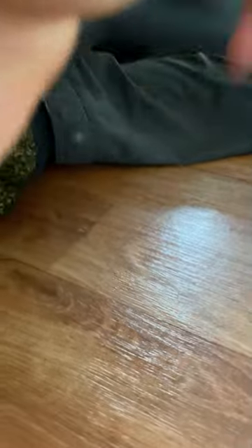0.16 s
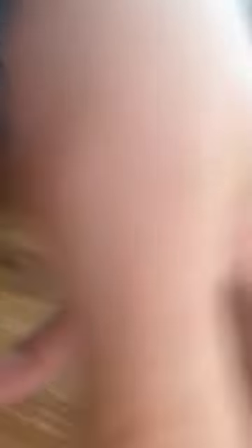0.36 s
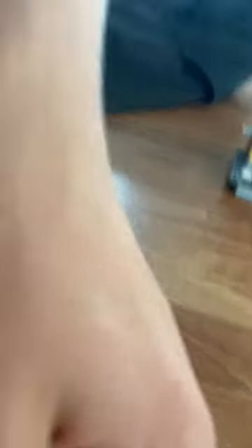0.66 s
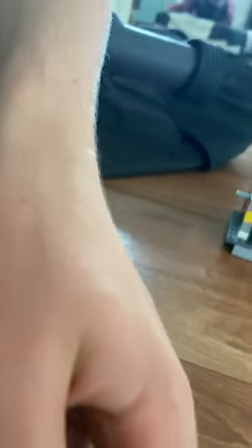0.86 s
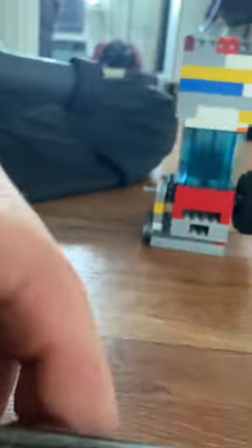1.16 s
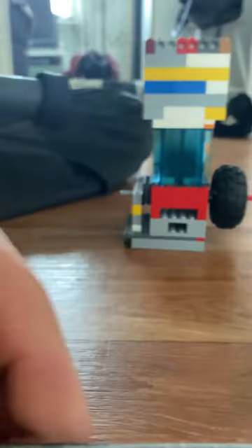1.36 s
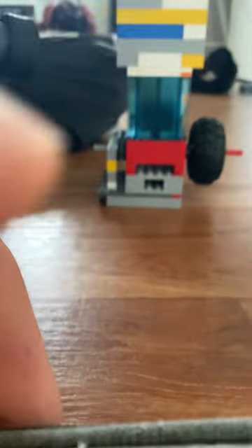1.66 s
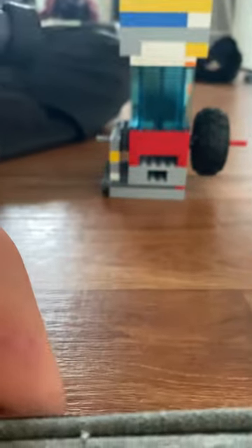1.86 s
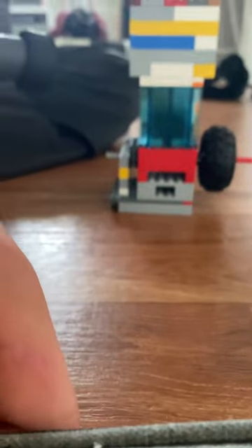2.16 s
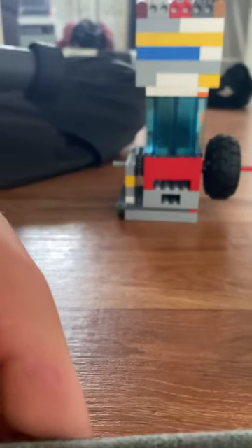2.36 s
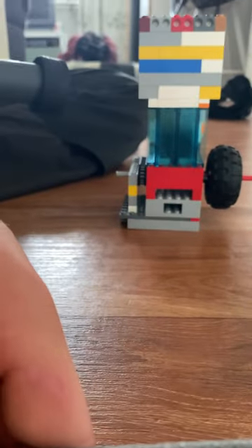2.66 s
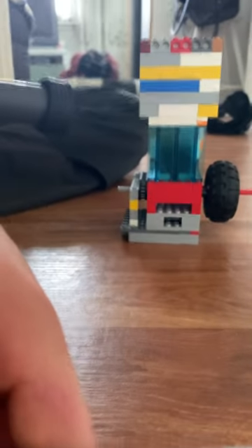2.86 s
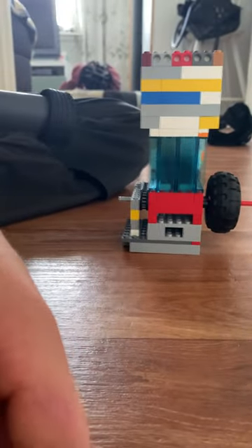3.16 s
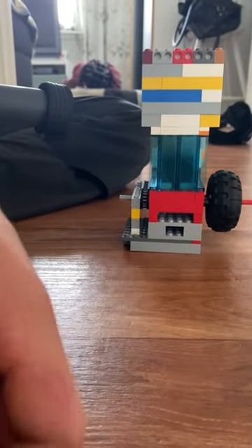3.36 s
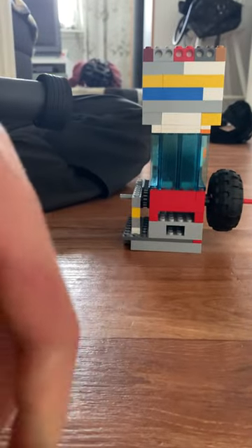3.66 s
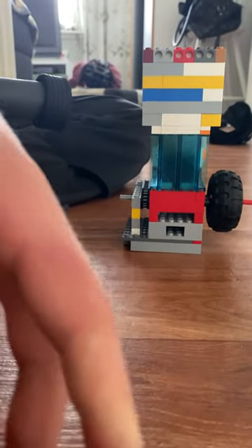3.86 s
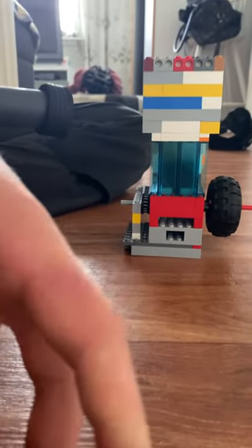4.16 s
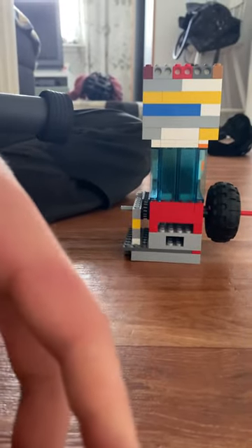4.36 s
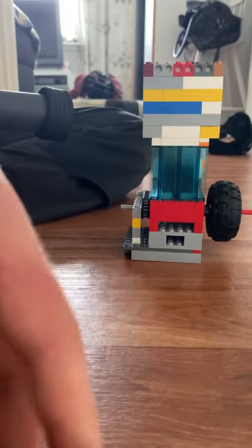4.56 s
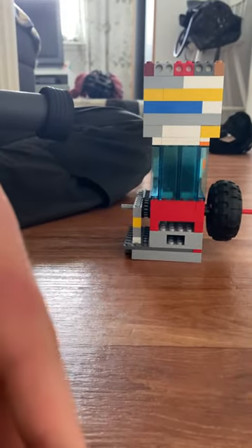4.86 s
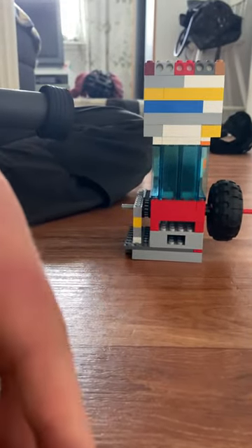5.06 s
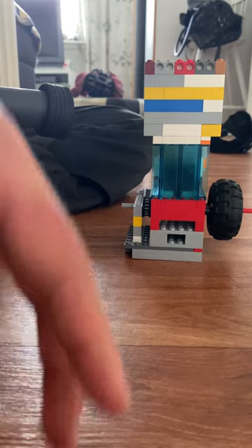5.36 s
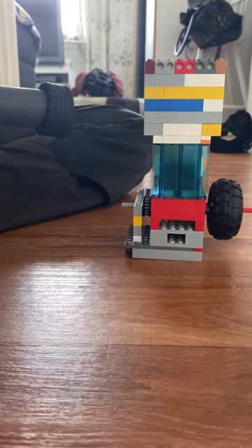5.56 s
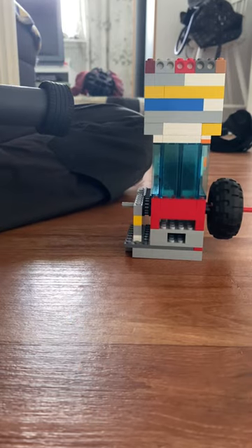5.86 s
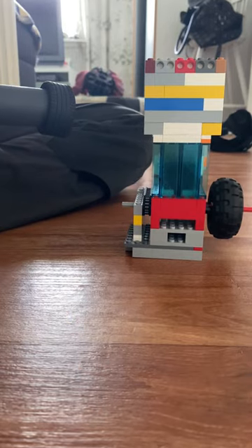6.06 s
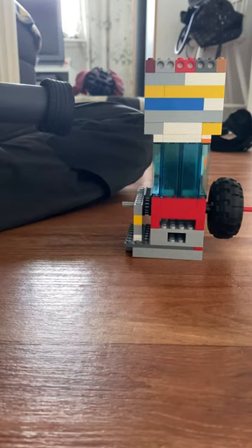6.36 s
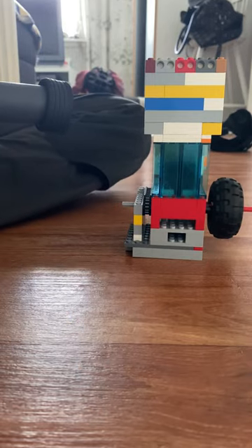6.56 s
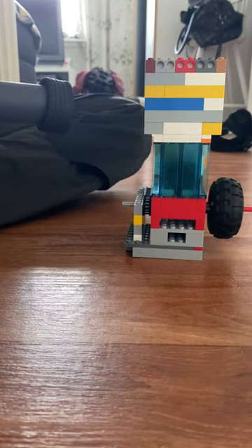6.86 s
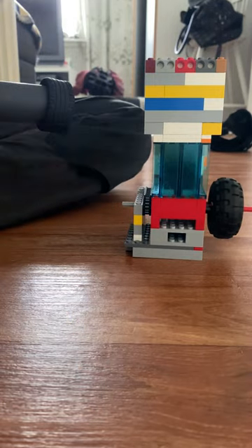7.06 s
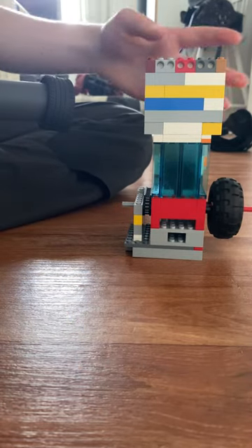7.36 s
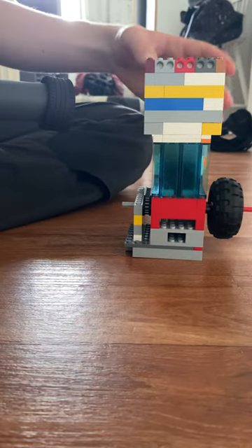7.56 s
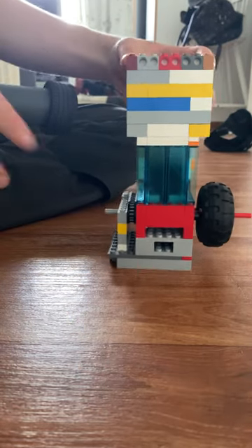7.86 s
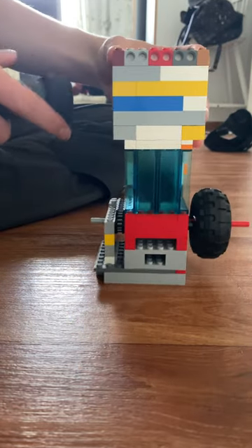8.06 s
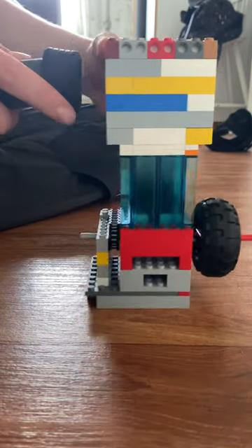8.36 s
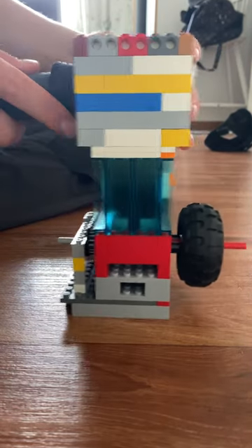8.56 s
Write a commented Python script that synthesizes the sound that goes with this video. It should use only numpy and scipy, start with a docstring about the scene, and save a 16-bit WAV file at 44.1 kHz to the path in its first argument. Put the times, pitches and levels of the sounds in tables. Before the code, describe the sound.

Close handling bumps and scrapes on floorboards settle to near quiet, before a hard switch click starts a rushing vacuum that whistles and abruptly chokes shut.

```python
"""Skin and cloth rub, boards thud and plastic clicks as a phone is shuffled on a wooden floor by a toy of bricks.
Then a vacuum cleaner on the left is switched on; air rushes until the nozzle sucks shut on the toy with a thump.
Thuds and clicks are sums of decaying modes; rubbing and air are shaped noise, the air echoing along its hose.
Two microphones hear each source with their own level balance, phase lead and share of scattered sound.
"""
import sys
import numpy as np
from scipy import signal
from scipy.fft import rfft, irfft, next_fast_len
from scipy.io import wavfile
from scipy.ndimage import uniform_filter1d

SR = 44100
rng = np.random.default_rng(int(sys.argv[2]) if len(sys.argv) > 2 else 0)


def to_wav(s):
    """Save 16-bit WAV."""
    ch = np.atleast_2d(s).T  # columns
    pcm = np.round(np.clip(ch, -1, 1) * 32767)  # PCM
    wavfile.write(sys.argv[1], SR, pcm.astype(np.int16))


N = 384980
T = np.arange(N) / SR
SIZE = next_fast_len(N, True)
HZ = np.maximum(np.arange(SIZE // 2 + 1) * SR / SIZE, 1)


def undb(db):
    """Logarithmic level: the amplitude gain of a dB value."""
    return 10 ** (np.asarray(db) / 20)


def across(table):
    """Spectral interpolation: a (hz, value) table at every frequency, joined on a log axis."""
    hz, value = np.transpose(table)
    return np.interp(np.log(HZ), np.log(hz), value)


def curve(table):
    """Linear interpolation in time: a (time_s, value) table at every sample."""
    time_s, value = np.transpose(table)
    return np.interp(T, time_s, value)


def walk(rate):
    """Slow random modulation: levels held 1 / rate s and smoothed twice; spread near 1."""
    k = int(SR / rate)
    held = np.repeat(rng.standard_normal(N // k + 1), k)
    return 1.3 * uniform_filter1d(uniform_filter1d(held, k), k)[:N]


def noise(gain, flicker_db=0, rate=20):
    """Filtered Gaussian noise: a direct and a scattered part, scaled to rms 1, then flickering in level."""
    spectra = rng.standard_normal((2, len(HZ), 2)) @ [1, 1j]
    x = irfft(gain * spectra, SIZE)[:, :N]
    return x / x.std() * undb(flicker_db * walk(rate))


def colour(spectrum):
    """Band limiting: gain per frequency, falling steeply past both ends of the table."""
    low, high = spectrum[0][0], spectrum[-1][0]
    skirts = np.minimum(1, HZ / low) ** 3 * np.minimum(1, high / HZ) ** 3
    return undb(across(spectrum)) * skirts


def echoes(x, t60_s):
    """Exponential reverberant decay: dense random reflections of unit energy."""
    t = T[:SR // 2]
    tail = rng.standard_normal(len(t)) * 1000. ** (-t / t60_s)
    return signal.fftconvolve(x, tail / np.linalg.norm(tail))[:N]


def blows(times, peaks_db, share_db, rings, modes, lag_cycles, spread_db, detune, size):
    """Modal impact: each blow rings the modes with its own shares; low modes build up later."""
    out, t = np.zeros(N + size), T[:size, None]
    hz, mode_db, t60_s = np.transpose(modes)
    chance = rng.standard_normal((len(times), 2, len(modes)))
    for s, peak_db, db, ring, (pitch_chance, level_chance) in zip(times, peaks_db, share_db, rings, chance):
        f = hz * (1 + detune * pitch_chance)
        swell = 1 - np.exp(-(t * f / lag_cycles) ** 2)
        decay = 1000. ** (-t / (t60_s * max(ring, .1)))
        partials = swell * decay * np.sin(2 * np.pi * f * t)
        sound = partials @ undb(mode_db + db + spread_db * level_chance)
        start = int(s * SR)
        out[start:start + size] += undb(peak_db) * sound / np.abs(sound).max()
    return out[:N]


# quiet room spectrum: pitch_hz, level_db (per Hz)
ROOM_SPECTRUM = [(200, -7), (400, -12.5), (560, -26.5), (3500, -45), (16000, -55)]
# faint steady tones: pitch_hz, level_db
ROOM_TONES = [(232, -75.5), (398, -75)]
ROOM_DB = -71


def quiet_room():
    """Stationary background: shaped noise with a few faint sinusoids of wavering level."""
    room = undb(ROOM_DB) * noise(colour(ROOM_SPECTRUM), flicker_db=1.5, rate=9)
    for hz, db in ROOM_TONES:
        room += undb(db + 2 * walk(9.7)) * np.sin(2 * np.pi * hz * T)
    return room


# weight shifting on the boards: time_s, level_db
SHUFFLE_LEVEL = [(0, -67), (.15, -47.5), (.7, -45), (1.6, -54.5), (1.8, -53), (2.6, -56), (3.0, -46),
                 (3.3, -58), (3.7, -57.5), (4.4, -47), (5.2, -60), (7.3, -54.5)]
# spectrum of the loaded boards: pitch_hz, level_db (per Hz)
RUMBLE_SPECTRUM = [(25, -19), (54, 7), (150, 0.5), (240, -12.5), (450, -21)]


def board_rumble():
    """Forced low-frequency vibration: the boards rumble under shifting weight."""
    return undb(curve(SHUFFLE_LEVEL)) * noise(colour(RUMBLE_SPECTRUM), flicker_db=3, rate=16)


SNAGS_PER_S, SNAG_DB = 90, 3  # mean rate of the catches; mean of their random strength


def snags():
    """Stick-slip friction: gain jumps at each catch of the skin and dies away in a few ms."""
    caught = rng.random(N) < SNAGS_PER_S / SR
    kicks = caught * undb(SNAG_DB * rng.exponential(size=N))
    return 1 + signal.lfilter([.35], [1, -np.exp(-1 / (.003 * SR))], kicks)


def bands(table, centres_hz):
    """Independent band modulation: the colour of the noise shifts as each band flickers alone."""
    gain, total = colour(table), 0
    for hz in centres_hz:
        bell = np.exp(-np.log2(HZ / hz) ** 2 * 1.5)
        band = noise(gain * bell, flicker_db=3.5, rate=18)
        total = total + band * np.interp(hz, HZ, gain) * hz ** .5
    return total


# sliding strokes: start_s, length_s, hiss_level_db, scrape_above_hiss_db, scrape_pitch_hz
RUB_STROKES = [(0.0, 0.1, -54.5, -2.5, 2030), (0.132, 0.029, -43.5, 1.5, 1870),
               (0.212, 0.082, -58, 4.5, 1900), (0.324, 0.18, -58, 7.5, 1640),
               (0.483, 0.17, -56.5, 12.5, 1560), (0.66, 0.22, -48, 3, 1100), (0.828, 0.24, -51, 6.5, 1420),
               (1.018, 0.38, -56, 5.5, 910), (1.342, 0.16, -48, 1.5, 830), (1.529, 0.15, -55, 0.5, 925),
               (1.759, 0.058, -64, 7.5, 1080), (1.879, 0.28, -58, 5, 1010), (2.249, 0.089, -56, 5, 890),
               (2.489, 0.15, -70, 7, 870), (2.692, 0.27, -62, 8, 1000), (3.025, 0.22, -63.5, 7, 1020),
               (3.233, 0.32, -62, 7.5, 975), (3.549, 0.18, -73.5, 8.5, 1320), (3.79, 0.25, -63.5, 10, 1054),
               (4.111, 0.17, -61, 9.5, 940), (4.314, 0.13, -62, 9, 1170), (4.452, 0.2, -68.5, 11.5, 1420),
               (4.634, 0.13, -58, 10, 960), (4.818, 0.29, -69.5, 9.5, 980), (5.104, 1.23, -87.5, 11, 1560),
               (5.909, 0.082, -66.5, 9.5, 2610), (5.987, 0.24, -82.5, 14.5, 2250),
               (6.355, 0.15, -67, 18.5, 910), (6.522, 1, -87, 15.5, 1470)]
STROKE_RISE_S, STROKE_FALL_S = 0.085, .12
TONE_DB, TONE_OCTAVES = -3.5, 0.15  # toned part against the broad scrape; its half width


def strokes(hiss, scrape, grit):
    """Enveloped friction noise: a stroke swells, holds and fades, its scrape leaning to one tone."""
    out = np.zeros((2, N))
    for s, length, hiss_db, scrape_db, tone_hz in RUB_STROKES:
        first = max(int((s - STROKE_RISE_S) * SR), 0)
        span = slice(first, int((s + length + STROKE_FALL_S) * SR))
        since = T[span] - s
        rise = np.clip(since / STROKE_RISE_S + .5, 0, 1) ** 2
        fall = np.clip(.5 - (since - length) / STROKE_FALL_S, 0, 1) ** 2
        edges_hz = tone_hz * 2 ** (TONE_OCTAVES * np.array([-1, 1]))
        tone = signal.lfilter(*signal.butter(1, edges_hz, "bandpass", fs=SR), grit[:, span])
        rough = scrape[:, span] + undb(TONE_DB) * tone / tone.std()
        out[:, span] += rise * fall * undb(hiss_db) * (hiss[:, span] + undb(scrape_db) * rough)
    return out


# dull scrape spectrum: pitch_hz, level_db (per Hz)
SCRAPE_SPECTRUM = [(200, 4), (400, -11.5), (900, -11), (1500, -15.5), (2500, -16.5)]
# bright hiss spectrum: pitch_hz, level_db (per Hz)
HISS_SPECTRUM = [(2200, -6), (3500, -1.5), (6000, -2.5), (9000, -1.5), (12000, -11.5), (16000, -24)]


def rubbing():
    """Sliding friction: skin and cloth catch unevenly, giving a scrape, a hiss and a toned grit."""
    catch = snags()
    scrape = bands(SCRAPE_SPECTRUM, 350 * 2.2 ** np.arange(3)) * catch
    hiss = bands(HISS_SPECTRUM, 3000 * 1.9 ** np.arange(3)) * catch
    grit = noise(1, flicker_db=3.5, rate=35) * catch
    return strokes(hiss / hiss.std(), scrape / scrape.std(), grit)


# blows on the floor: start_s, peak_level_db, strongest_pitch_hz, ring_length (share of the free ring)
FLOOR_BLOWS = [(0.165, -41.5, 81, 0.35), (0.24, -29.5, 174, 0.7), (0.354, -20.5, 225, 0.46),
               (0.372, -20.5, 130, 1), (0.432, -31, 78.1, 0.83), (0.529, -13, 310, 0.7),
               (0.888, -19.5, 123, 0.5), (0.979, -28, 134, 0.67), (1.107, -17, 117, 0.18),
               (1.439, -21.5, 74, 0.77), (1.481, -23.5, 114, 0.89), (1.585, -33.5, 102, 0.19),
               (2.298, -30, 113, 0.66), (2.756, -20.5, 167, 1), (2.905, -22, 99, 1),
               (3.161, -31.5, 325, 0.25), (3.776, -38, 147, 0.71), (3.862, -35.5, 255, 0.26),
               (3.944, -30, 106.6, 0.61), (4.15, -34.5, 207, 0.42), (4.196, -26, 275, 0.74),
               (4.224, -22, 181, 0.29), (4.242, -18.5, 176.6, 0.18), (4.257, -19, 125, 0.84),
               (4.634, -33, 243, 0.48), (6.207, -41.5, 200, 0.42), (6.362, -30.5, 280, 1),
               (7.209, -29, 89, 0.45)]
# modes of the boards: pitch_hz, level_db, t60_s
BOARD_MODES = [(58.6, 2.5, 0.41), (81.5, 2.5, 0.58), (123.3, 1.5, 0.29), (154.4, -2.5, 0.17),
               (210.4, -2.5, 0.23), (272, -2, 0.12), (321.5, -0.5, 0.11)]


def thuds():
    """Modal excitation by position: boards ring most near the tone of the struck spot."""
    s, peak_db, spot_hz, ring = np.transpose(FLOOR_BLOWS)
    octaves = np.log2(np.array(BOARD_MODES)[:, 0] / spot_hz[:, None])
    share_db = np.where(octaves > 0, -7 * octaves, 17 * octaves)
    return blows(s, peak_db, share_db, ring, BOARD_MODES,
                 lag_cycles=1.2, spread_db=2.5, detune=.02, size=SR // 2)


# plastic knocks: start_s, level_db (before crack and distance), strongest_pitch_hz, hardness_octaves
PLASTIC_KNOCKS = [(0.431, -34.5, 1330, 7), (0.509, -33, 1806, 2), (0.526, -22.5, 1670, 3),
                  (0.529, -19, 1770, -2), (0.534, -19, 1360, 0), (0.584, -38, 3000, 0),
                  (1.103, -20, 650, -1), (1.118, -32, 6400, 4), (1.126, -39, 6300, 1.0),
                  (1.481, -25, 1020, 0.5), (1.4857, -26, 2400, 1), (1.534, -35.5, 990, 4),
                  (1.988, -39.5, 1050, 11), (2.757, -31.5, 797, -2), (2.772, -37, 1000, -2.5),
                  (2.908, -28.5, 840, -1), (3.16, -42, 930, 0.5), (3.412, -47, 2540, 2),
                  (3.865, -41.5, 2200, -4), (3.94, -33, 1220, 0.5), (4.192, -42.5, 504, 6),
                  (4.212, -27.5, 890, 0), (4.228, -24.5, 1490, -0.1), (4.243, -24, 1500, -0.1),
                  (4.26, -29, 1400, 0.1), (4.633, -35.5, 1050, -0.5), (4.684, -32, 1270, 0.5),
                  (6.361, -27.5, 990, 0.5), (6.898, -42.5, 864, -0.5), (7.052, -41.5, 600, -2.5),
                  (7.094, -39, 1086, -2.5), (7.151, -33.5, 640, -2.5), (7.177, -25, 800, -1),
                  (7.221, -14, 750, 0), (7.381, -9.5, 1460, 0)]
CRACK_DB, CRACK_RISE_S, CRACK_T60_S = -10, .0007, .01


def cracks():
    """Contact stiffness: the first touch is a noise burst, brighter for harder contacts."""
    out, t = np.zeros(N), T[:SR // 50]
    envelope = np.minimum(t / CRACK_RISE_S, 1) * 1000. ** (-t / CRACK_T60_S)
    for s, db, _, hardness in PLASTIC_KNOCKS:
        start = int(s * SR)
        edge_hz = np.clip(7000 * 2. ** hardness, 300, 15000)
        burst = rng.standard_normal(len(t)) * envelope
        out[start:start + len(t)] += undb(db) * signal.lfilter(*signal.butter(2, edge_hz, fs=SR), burst)
    return undb(CRACK_DB) * out


# modes of the plastic bricks: pitch_hz, level_db, t60_s
BRICK_MODES = [(446, 10, 0.02), (621, 9, 0.022), (941, 9, 0.012), (1334, 5, 0.014), (1897, 6.5, 0.012),
               (2550, 4, 0.0081), (4240, -10, 0.007), (6230, -4.5, 0.011)]
FAR_S = 6.3  # later knocks come from the cleaner across the room


def clicks():
    """Modal impact and reverberation: the struck part rings near its tone and the room adds a tail."""
    s, peak_db, tone_hz, _ = np.transpose(PLASTIC_KNOCKS)
    share_db = -12 * np.abs(np.log2(np.array(BRICK_MODES)[:, 0] / tone_hz[:, None]))
    rings = blows(s, peak_db, share_db, np.ones(len(s)), BRICK_MODES,
                  lag_cycles=1.1, spread_db=1.5, detune=.04, size=SR // 10)
    knocks = rings + cracks()
    far = T > FAR_S  # distant knocks lose direct sound and gain echoes
    return undb(-5 * far) * knocks + echoes(undb(np.where(far, -4, -17)) * knocks, 0.29)


SWITCH_S, SEAL_S = 7.2, 8.598  # the cleaner is switched on; the nozzle seals on the toy
# air flow through the open nozzle: time_s, level_db
FLOW_LEVEL = [(7.2, -51.5), (7.3, -44), (7.39, -29.5), (7.69, -22), (8.12, -19.5), (8.33, -21),
              (8.57, -21.5)]
# edge whistle against the rush as the nozzle nears the toy: time_s, level_db
NEAR_LEVEL = [(7.4, -26), (8.14, -13), (8.2, -4.5), (8.33, -10), (8.5, -5)]
FULL_DB = -21  # rush level taken as full flow
BASS_DB, BASS_SLOPE = -11, -0.53  # motor rumble against the rush at full flow; dB per dB of flow
TREBLE_DB, TREBLE_SLOPE = -6.5, 0.43  # nozzle hiss against the rush at full flow; dB per dB of flow
SHUT_DB, LEAK_DB_PER_S = -44, 98.5  # the sealed nozzle lets air in again
SHUT_BASS_DB, SHUT_TREBLE_DB, SHUT_EDGE_DB = -6.5, -4.5, -12


def suction():
    """Flow-dependent source level: dB of the rush, and of rumble, hiss and whistle against it."""
    flow_db, shut = curve(FLOW_LEVEL), T >= SEAL_S
    over_full_db = flow_db - FULL_DB
    rush_db = np.where(shut, SHUT_DB + LEAK_DB_PER_S * (T - SEAL_S), flow_db)
    bass_db = np.where(shut, SHUT_BASS_DB, BASS_DB + BASS_SLOPE * over_full_db)
    treble_db = np.where(shut, SHUT_TREBLE_DB, TREBLE_DB + TREBLE_SLOPE * over_full_db)
    edge_db = np.where(shut, SHUT_EDGE_DB, curve(NEAR_LEVEL))
    return rush_db, bass_db, treble_db, edge_db


# air shearing past the toy: pitch_hz, width_hz, level_db
EDGE_BANDS = [(5210, 1240, -19.5), (7460, 120, -20.5)]


def edge_gain():
    """Edge-tone resonance: narrow bands where air shears past the toy."""
    return sum(undb(db) / (1 + (2 * (HZ - hz) / width) ** 4) for hz, width, db in EDGE_BANDS)


# turbulence in the hose: pitch_hz, level_db (per Hz)
RUSH_SPECTRUM = [(200, -6.5), (450, -0.5), (800, 3.5), (1000, 2.5), (1220, 6), (1480, -4), (1800, -3),
                 (2050, -0.5), (2520, -8), (3000, -5), (3900, -17.5), (4300, -9.5)]
# motor rumble: pitch_hz, level_db (per Hz)
MOTOR_SPECTRUM = [(60, -5.5), (160, 2.5), (250, 0)]
# nozzle hiss: pitch_hz, level_db (per Hz)
NOZZLE_SPECTRUM = [(4000, -8.5), (5000, -3.5), (8000, 0), (11000, 2.5), (16000, -3.5)]
HOSE_HZ, HOSE_ECHO = 77.7, .33  # spacing of the hose resonances; share of each echo kept in the bass
SAG, SAG_S, SAG_SPAN_S = 0.029, 8.1, 0.14  # the toy lengthens the nozzle: resonances drop by this share


def rush():
    """Turbulence in a resonant pipe: noise echoes along the hose, with motor rumble, hiss and edge whistle."""
    rush_db, bass_db, treble_db, edge_db = suction()
    echo = HOSE_ECHO * np.exp(-HZ / 6000 - 2j * np.pi * HZ / HOSE_HZ)
    hose = 1 / (1 - echo)  # organ-pipe comb
    free_gain = colour(RUSH_SPECTRUM)
    near_gain = np.interp(HZ * (1 + SAG), HZ, free_gain)
    free = noise(free_gain * hose, flicker_db=1.3, rate=40)
    near = noise(near_gain * hose, flicker_db=1.3, rate=40)
    covered = np.clip((T - SAG_S) / SAG_SPAN_S + .5, 0, 1)
    air = np.sqrt(1 - covered) * free + np.sqrt(covered) * near
    air += undb(bass_db) * noise(colour(MOTOR_SPECTRUM), flicker_db=1.2, rate=12)
    air += undb(treble_db) * noise(colour(NOZZLE_SPECTRUM), flicker_db=1, rate=45)
    air += undb(edge_db) * noise(edge_gain(), flicker_db=1.2, rate=30)
    spin_up = np.clip((T - SWITCH_S) / 0.0091, 0, 1)
    return spin_up * undb(rush_db) * air


GASP_DB, GASP_S = -13, .024


def gasp():
    """Jet noise in a narrowing gap: a burst swells just before the seal and stops within 3 ms after it."""
    swell = np.clip(1 - (SEAL_S - T) / GASP_S, 0, 1) ** .5
    stop = np.clip(1 - (T - SEAL_S) / .003, 0, 1)
    gain = colour(NOZZLE_SPECTRUM) + undb(13.0) * edge_gain() + undb(1.0) * colour(RUSH_SPECTRUM)
    return undb(GASP_DB) * swell * stop * noise(gain)


HUM_HZ, HUM_DB, HUM_RISE_S = 100, -38, 0.13
HUM_HOLD_S, HUM_FADE_DB_PER_S = .2, 32


def motor_hum():
    """Magnetic vibration: a sinusoid swells as the motor starts, holds, then fades."""
    since = T - SWITCH_S
    fade_db = -HUM_FADE_DB_PER_S * np.maximum(since - HUM_RISE_S - HUM_HOLD_S, 0)
    rise = np.clip(since / HUM_RISE_S, 0, 1) ** 2
    tone = np.sqrt(2) * np.sin(2 * np.pi * HUM_HZ * T)  # rms 1
    return rise * undb(HUM_DB + fade_db + 2 * walk(20)) * tone


AFTER_SEAL = np.maximum(T - SEAL_S - .004, 0)  # s since the air column stopped
THUMP_DB, THUMP_HZ, THUMP_S = -18.5, 61, 0.0095  # peak of the envelope; final pitch; time to the peak


def hose_thump():
    """Momentum transfer: the hose jolts as the air column stops, its pitch dropping."""
    turns = THUMP_HZ * AFTER_SEAL + 1.1 * (1 - np.exp(-AFTER_SEAL / 0.006))
    envelope = AFTER_SEAL / THUMP_S * np.exp(1 - AFTER_SEAL / THUMP_S)
    return undb(THUMP_DB) * envelope * np.sin(2 * np.pi * turns)


WHINE_DB, WHINE_RISE_S, WHINE_HZ, WHINE_WIDTH_HZ = -39.5, .07, 557, 40


def fan_whine():
    """Narrow-band resonance: the unloaded fan sings, blurred, once the nozzle is shut."""
    rise = np.clip(AFTER_SEAL / WHINE_RISE_S, 0, 1) ** 2
    return undb(WHINE_DB) * rise * noise(1 / (1 + (2 * (HZ - WHINE_HZ) / WHINE_WIDTH_HZ) ** 2))


def vacuum():
    """Superposition and wall absorption: the cleaner's sounds add up and echo with less treble."""
    direct = rush() + gasp() + motor_hum() + hose_thump() + fan_whine()
    dulling = signal.butter(1, 4000, fs=SR)  # walls swallow the treble
    return np.array([x + undb(-5) * echoes(signal.lfilter(*dulling, x), .3) for x in direct])


# coherence of the two microphones: pitch_hz, common_share
COMMON_SHARE = [(60, .7), (500, .7), (1200, .92), (2600, .5), (7000, .45), (8800, .9), (10400, .92)]


def ports(pair, balance, lead, lag_s):
    """Interaural-style coherence: both microphones hear the direct sound, the right also a scattered share."""
    direct, scattered = rfft(pair, SIZE)
    alike, tilt = across(COMMON_SHARE), undb(across(balance) / 2)
    delay = np.exp(-1j * (across(lead) + 2 * np.pi * HZ * lag_s))
    right = alike * delay * direct + np.sqrt(1 - alike ** 2) * scattered
    return irfft([direct * tilt, right / tilt], SIZE)[:, :N]


# phase the case adds to the lag: pitch_hz, left_lead_rad
PHASE_LEAD = [(150, -1), (500, -.35), (1000, .3), (1250, -.2), (1700, -.1), (2000, -1.6), (2400, -.4),
              (5500, .2), (8000, 0)]
# blows reach both microphones through the case, almost together: pitch_hz, left_lead_rad
BLOW_LEAD = [(200, -.7), (600, 0)]
# balance of the cleaner: pitch_hz, left_minus_right_db
LEFT_BALANCE = [(60, -3), (250, 9), (600, 7), (1900, -6), (2600, -1), (3100, 14), (4700, 8), (5500, 15),
                (6500, 7), (8500, 5), (9200, 0)]
# balance of the nearby sounds: pitch_hz, left_minus_right_db
NEAR_BALANCE = [(60, -1), (150, -3), (1000, -1), (8000, -4), (11000, 0)]
PORT_LAG_S = .000272  # the right microphone hears the room this much later
BOUNCE_S, SMEAR_S = .0013, .008  # thud delay off the floor; t60 of clicks smeared by floor and hand


def scene():
    """Superposition: a quiet room, handling close to the phone and a cleaner on the left."""
    near = quiet_room() + board_rumble() + rubbing()
    low, high = thuds(), clicks()
    scattered = np.interp(T - BOUNCE_S, T, low) + echoes(high, SMEAR_S)
    struck = ports([low + high, scattered], NEAR_BALANCE, BLOW_LEAD, 0)
    handled = ports(near, NEAR_BALANCE, PHASE_LEAD, PORT_LAG_S)
    return struck + handled + ports(vacuum(), LEFT_BALANCE, PHASE_LEAD, PORT_LAG_S)


def record(dry):
    """Low-pass filtering: the phone cuts the top above 15850 Hz."""
    return signal.sosfilt(signal.ellip(10, .2, 80, 15850, fs=SR, output="sos"), dry)


dry = scene()
out = record(dry)
to_wav(out)
```